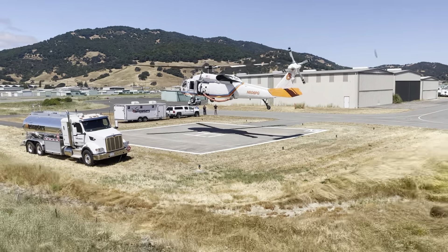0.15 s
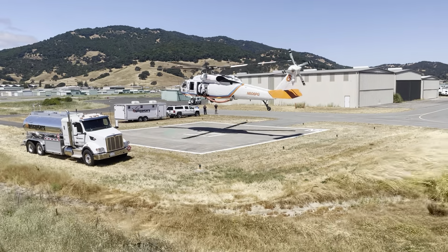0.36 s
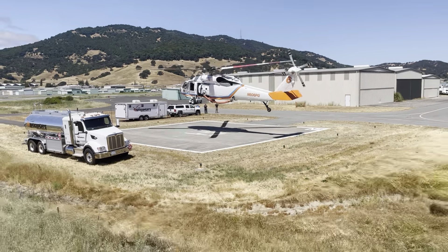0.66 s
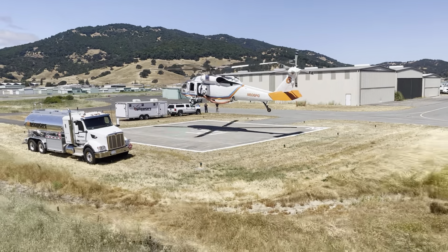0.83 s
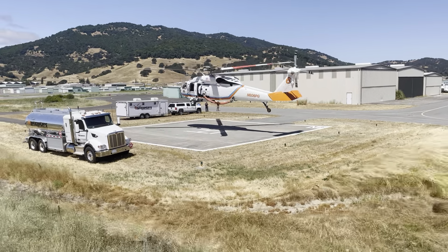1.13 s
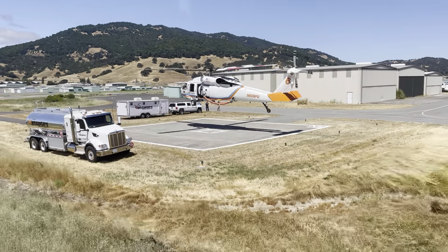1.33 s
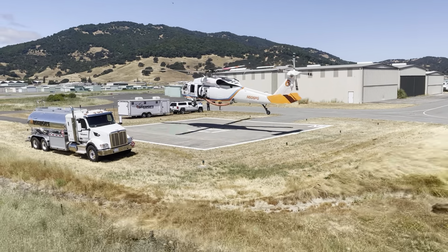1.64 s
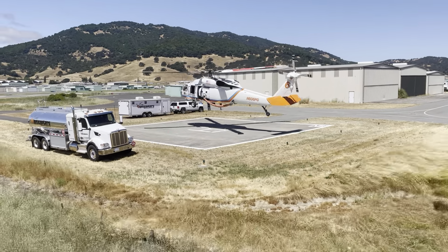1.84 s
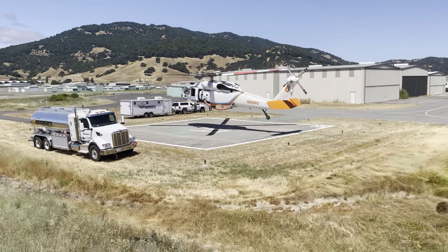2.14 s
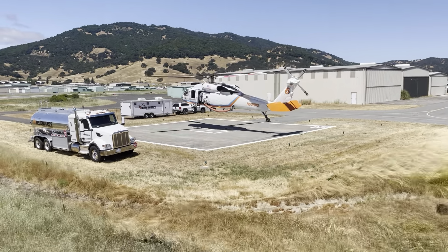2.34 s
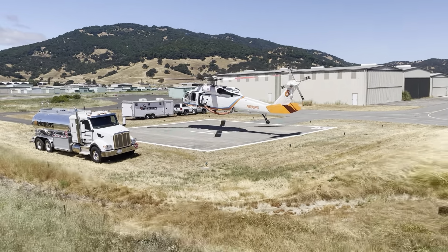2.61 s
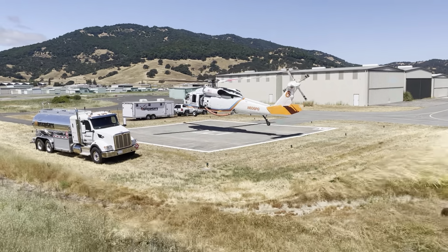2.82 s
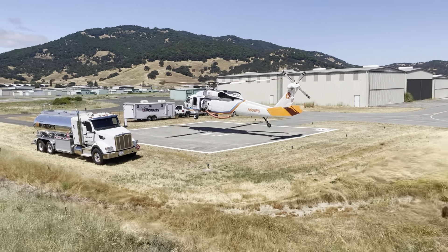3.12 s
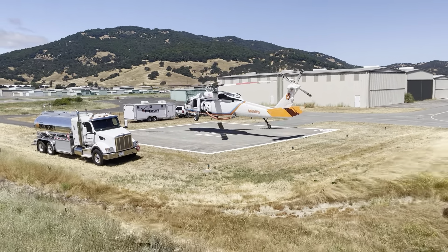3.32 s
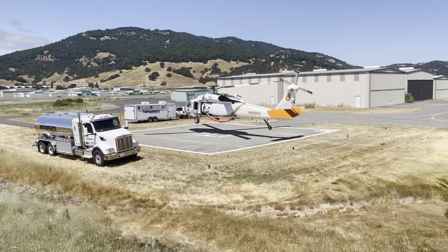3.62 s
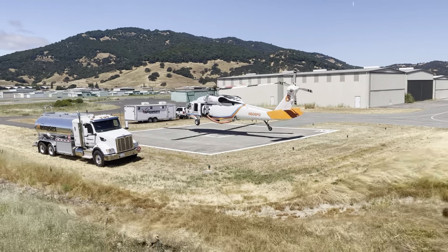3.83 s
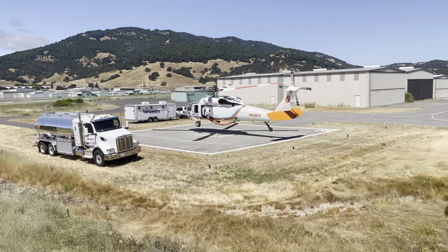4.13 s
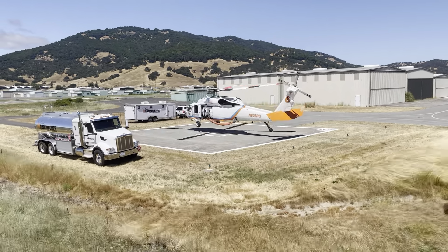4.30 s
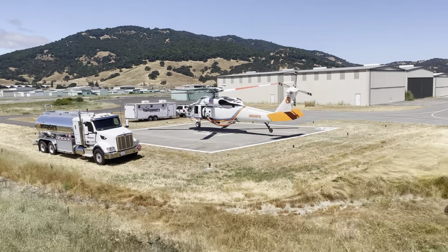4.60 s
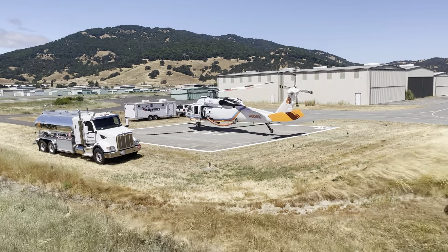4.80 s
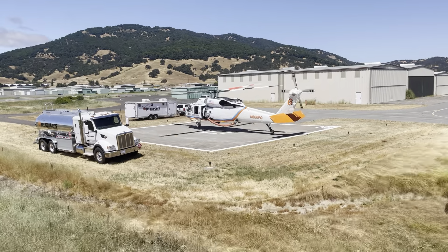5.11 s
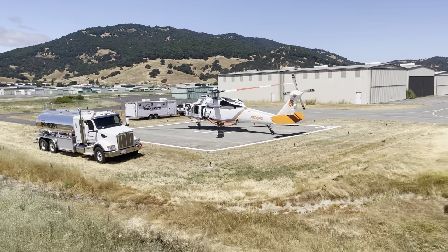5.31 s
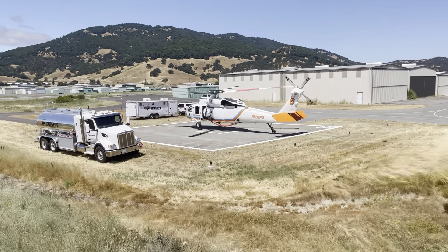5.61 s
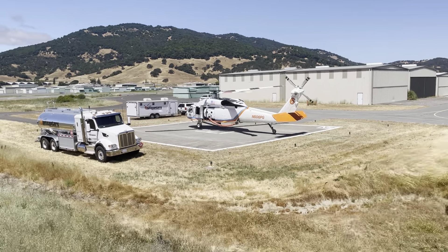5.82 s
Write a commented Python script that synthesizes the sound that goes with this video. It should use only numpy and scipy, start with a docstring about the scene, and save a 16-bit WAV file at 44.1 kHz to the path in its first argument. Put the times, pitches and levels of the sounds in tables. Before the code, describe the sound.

A twin-turbine helicopter descends to a pad across an open field, loud throughout for about six seconds. Noisy air pulses some seventeen times a second, coloured hollow by its ground reflection, under bright blade-tip hiss, broad exhaust roar, a faint very high whine and quick tail-rotor ticks. From 0 to 2.5 s rotor wash batters the stereo microphone: deep uneven buffeting, fluttering gusts and blunt, falling thuds, heaviest around 1.0 and 1.5 s. A thin gear tone flares now and then until 3 s, most clearly near 2.8. From 2 s the blades begin to crack in gritty bursts, with dry bright snaps between 3.3 and 5.2 s; the whine edges upward from 2.2 to 3.5. Brief gusts return near 4 s. The exhaust roar dips around 4.9 while low, hollow slaps thicken. At 5.2 s gusts and thuds crowd in again, then ease while the rotor keeps beating to the end.

```python
"""A twin-turbine helicopter sinks to a pad across a field: filtered noise beats once per main blade, direct and off
the ground, under tip hiss, turbine roar, thin whine, gear tone and tail ticks. In the first 2.5 s rotor wash buffets
two microphone ports with noise gusts and falling, squared-off thuds; the gear tone flares until 3 s. From 2 s blades
crack in sudden noise bursts and snaps; the whine climbs from 2.2 to 3.5 s. The roar dips near 4.9 s, and gusts and
thuds crowd in again at 5.2 s."""
import sys
import numpy as np
from scipy import signal
from scipy.fft import rfft, irfft, next_fast_len
from scipy.io import wavfile
from scipy.ndimage import uniform_filter1d, minimum_filter1d, map_coordinates

SR = 44100
rng = np.random.default_rng(int(sys.argv[2]) if len(sys.argv) > 2 else 0)


def wav_record(signal):
    """Record a signal, one row per channel, as 16-bit PCM in the file named by sys.argv[1]."""
    frames = np.transpose(np.atleast_2d(signal))
    bounded = np.clip(frames, -1, 1)
    # unit amplitude maps onto the largest positive 16-bit level
    quanta = np.round(bounded * 32767).astype(np.int16)
    wavfile.write(sys.argv[1], SR, quanta)


N = 262387

BLADE_HZ, TAIL_HZ = 17.25, 79.6  # blade passes per second, main and tail rotor
SOUND_M_PER_S = 343


def amp(db):
    """Decibels to gain."""
    return 10 ** (np.asarray(db) / 20)


def unit(x):
    """Scaled to rms 1."""
    return x / np.sqrt(np.mean(x ** 2) + 1e-20)


def along(points, hz):
    """Rows of (hz, value, ..) interpolated on a log frequency axis, one curve per value column."""
    point_hz, *columns = np.transpose(points)
    return [np.interp(np.log(hz + 1), np.log(point_hz + 1), column) for column in columns]


def curves(rows):
    """One value per sample for each column after the time."""
    time_s, *columns = np.transpose(rows)
    return [np.interp(np.arange(N) / SR, time_s, column) for column in columns]


def wobble(rate_hz):
    """A smooth random curve with rate_hz knots a second."""
    knots = rng.standard_normal(int(N * rate_hz / SR) + 4)
    return map_coordinates(knots, [np.arange(N) * rate_hz / SR])


def swells(at_s, sigma_s, peak_db, base_db):
    """Bell-shaped swells of gain over a base level, added in power."""
    t = np.arange(N) / SR
    bells = amp(np.c_[peak_db]) * np.exp(-.5 * ((t - np.c_[at_s]) / np.c_[sigma_s]) ** 2)
    return np.sqrt(amp(base_db) ** 2 + np.sum(bells ** 2, axis=0))


def filtered(x, response):
    """x times a complex response of frequency."""
    m = next_fast_len(N + SR // 2)
    spectrum = rfft(x, m) * response(np.fft.rfftfreq(m, 1 / SR))
    return irfft(spectrum, m)[..., :N]


def rush(spectrum, patchy_db, ports, echo=0):
    """Patchy noise of rms 1 at both ports; echo = share that comes again off the ground."""
    z = signal.stft(rng.standard_normal((2, N)), nperseg=256)[2]
    field = uniform_filter1d(rng.standard_normal(z.shape[1:]), size=4, axis=0)
    field = uniform_filter1d(field, size=10, axis=1)
    pair = signal.istft(z * amp(patchy_db * unit(field)), nperseg=256)[1][:, :N]

    def colour(hz):
        # the longer path over the ground makes a comb; rough grass blurs it in the treble
        ground = 1 + echo * np.exp(-hz / 2500 - 2j * np.pi * hz * 0.002953)
        turn = np.arccos(np.clip(along(ports, hz)[0], 0, 1)) / 2
        return amp(along(spectrum, hz)[0]) * ground * [np.cos(turn), np.sin(turn)]

    def lead(hz):
        _, angle_rad, louder_db = along(ports, hz)
        half = amp(louder_db / 2) * np.exp(.5j * angle_rad)
        return np.array([half, 1 / half])

    shared, own = filtered(pair, colour)
    return unit(filtered(np.array([shared + own, shared - own]), lead))


def firm(x, size):
    """Noise with its chance dips evened out over size samples, so that every burst lands with its full weight."""
    power = uniform_filter1d(np.mean(x ** 2, axis=0), size=size)
    return unit(x / np.sqrt(np.abs(power) + .05))


# aircraft drift, which shifts the beat: time_s, beyond_nearest_m
DRIFT_PATH = [(0, 4.2), (.6, 2.8), (1.4, .7), (2.6, 0), (3.4, .7), (4.2, 1), (5, 1.7), (5.95, 1.7)]


def beat(late, steep, blades_db, uneven_db):
    """A swell (-1 to 1) per blade, late by a share of the beat, squarer with steep; and a strength curve in dB."""
    delay_s = curves(DRIFT_PATH)[0] / SOUND_M_PER_S
    turns = (np.arange(N) / SR - delay_s) * BLADE_HZ - late
    blade = np.round(turns).astype(int)
    chance_db = rng.normal(0, uneven_db, blade[-1] + 2)[blade]
    strength_db = np.take(blades_db, blade, mode="wrap") + chance_db
    swell = np.cos(2 * np.pi * turns)
    return np.tanh(steep * swell) / np.tanh(steep), strength_db * (1 + swell) / 2


# main rotor before beat and waver: time_s, level_db, beat_depth_db, ground_peak_1_db, ground_peaks_2_3_db
ROTOR_LEVELS = [(0, -24.5, 3, -49, -44), (.5, -23, 4, -58, -47), (.8, -20.5, 2.5, -38, -33),
                (1.2, -21, 3.5, -51, -28.5), (1.5, -23.5, 4, -34, -36), (1.8, -23, 2, -51, -23),
                (2.3, -22.5, 4, -31, -32.5), (2.75, -21.5, 2, -30.5, -46), (2.98, -25, 4, -32, -21.5),
                (3.2, -26.5, 2, -24, -25.5), (3.45, -27, 5.5, -37.5, -34), (3.75, -32, 1, -30.5, -29.5),
                (4.05, -22.5, 6, -30, -58), (4.2, -28.5, 4.5, -26.5, -27.5), (4.35, -28.5, 5.5, -32, -26),
                (4.6, -26, 2.5, -27.5, -26.5), (4.78, -19.5, 4, -21.5, -23), (4.95, -26.5, 3.5, -20, -25.5),
                (5.1, -24, 6.5, -24, -29), (5.36, -21.5, 4, -54, -29), (5.6, -29, 7, -32, -31.5),
                (5.95, -27.5, 4, -22.5, -32.5)]
# churned air, before the ground echo: freq_hz, relative_db
SWISH_SPECTRUM = [(30, -90), (60, -67), (200, -11), (400, -8.5), (800, -7.5), (1100, -2.5), (1350, -5.5),
                  (1650, -9), (2200, -9), (2800, -15), (3500, -18.5), (6000, -24), (9000, -95),
                  (12000, -110)]
# first ground-comb peak: freq_hz, relative_db
DRUM_SPECTRUM = [(60, -110), (170, -20), (260, -8), (345, 3), (430, -2), (520, -11), (620, -24),
                 (2000, -110)]
# second and third ground-comb peaks: freq_hz, relative_db
HOLLOW_SPECTRUM = [(200, -110), (500, -26), (630, -5), (715, 0), (800, -6), (900, -11), (1060, -3),
                   (1250, -12), (1600, -36), (4000, -110)]
# port pair for sound from the aircraft: freq_hz, likeness_0_to_1, left_leads_rad, left_louder_db
AIRCRAFT_PORTS = [(100, .8, .3, 0), (500, .5, .1, 1.5), (1000, .6, -.2, 1.7), (2400, .8, -.5, .5),
                  (3300, .62, -1, -2), (4400, .55, -.5, -1.5), (5200, .3, -.9, -1.5), (6000, .1, 1.2, -1.5),
                  (6900, .55, 2.7, -1), (7600, .99, 3.1, 0), (8350, .99, 3.2, 0), (8900, .87, 3.8, 0),
                  (10300, .8, 5.1, 0), (10500, .98, 6.1, 0), (12250, .99, 6.3, 0), (12600, .55, 7.3, 0),
                  (13400, .8, 8.4, 0), (13800, .99, 9.4, 0), (16000, .99, 9.4, 0)]
# churn strength of the four blades, alike: strength_db
CHURN_STRENGTHS_DB = [-4.5, -4.5, -4.5, -4.5]


def rotor():
    """Blade bursts of churned air; the lowest peaks of the ground comb swell as the height changes."""
    level_db, depth_db, drum_db, hollow_db = curves(ROTOR_LEVELS)
    swell, strength_db = beat(late=.28, steep=2.4, blades_db=CHURN_STRENGTHS_DB, uneven_db=.5)
    tail_db = 0.6 * np.cos(2 * np.pi * TAIL_HZ * np.arange(N) / SR)
    churn_db = .8 * wobble(50) + 1.1 * wobble(110) + .9 * wobble(250)
    body = amp(level_db) * rush(SWISH_SPECTRUM, patchy_db=1.5, ports=AIRCRAFT_PORTS, echo=0.28)
    alike = [(350, .85, 0, .5), (800, .65, -.2, 1.6)]  # these low peaks reach both ports much alike
    drum = amp(drum_db) * rush(DRUM_SPECTRUM, patchy_db=-0.9, ports=alike)
    hollow = amp(hollow_db) * rush(HOLLOW_SPECTRUM, patchy_db=2.5, ports=alike)
    beat_db = depth_db * (swell - 0.16) + strength_db
    return amp(beat_db + tail_db + churn_db) * (body + drum + hollow)


# blades that cut a vortex and crack, before edge and grit: start_s, crack_db, ground_peak_1_db, hold_s
SLAP_EVENTS = [(2.018, -26, -36, 0.0072), (2.074, -22, -34, .008), (2.221, -39, -24.5, .015),
               (2.29, -26, -25, .02), (2.335, -26, -24, 0.024), (2.392, -28, -25, 0.016),
               (2.438, -27, -34, .022), (2.549, -25.5, -37, .018), (2.602, -27, -35, 0.013),
               (2.666, -24, -32, 0.025), (2.718, -22, -24, 0.023), (2.782, -21.5, -22, 0.021),
               (2.836, -22, -30, 0.023), (2.902, -28, -28, 0.012), (2.955, -18.5, -42, 0.018),
               (3.014, -23.5, -26, .022), (3.064, -27, -28, .025), (3.125, -24.5, -30, 0.012),
               (3.188, -24, -25, 0.01), (3.247, -29, -23.5, 0.021), (3.363, -28.5, -37, 0.032),
               (3.421, -27, -24, .024), (3.489, -26, -33, 0.016), (3.541, -20, -26.5, 0.024),
               (3.604, -24.5, -30, 0.019), (3.655, -23.5, -35, .028), (3.719, -26, -36, 0.013),
               (3.771, -23, -20.5, .014), (3.828, -25, -24, 0.014), (3.893, -26, -24, 0.011),
               (4.06, -26.5, -24, 0.018), (4.129, -21.5, -29, 0.0075), (4.178, -27, -36, 0.027),
               (4.243, -24, -31, 0.025), (4.292, -25, -29, 0.035), (4.359, -26.5, -32, 0.034),
               (4.411, -21, -32, 0.022), (4.475, -25, -27, .016), (4.53, -25.5, -34, 0.021),
               (4.583, -29, -32, 0.032), (4.645, -32, -27, 0.02), (4.697, -24.5, -21, 0.02),
               (4.754, -23.5, -25, 0.018), (4.827, -29, -20, .025), (4.878, -22, -16.5, 0.027),
               (4.922, -21.5, -24, .005), (4.932, -24.5, -17, 0.031), (4.991, -22.5, -16.5, 0.031),
               (5.052, -22, -19, 0.031), (5.111, -31, -21, 0.022), (5.154, -30, -28, 0.017),
               (5.287, -21, -25, 0.018), (5.59, -33, -24, .015), (5.706, -32, -46, 0.01),
               (5.753, -35, -26, 0.0084), (5.855, -43, -36, 0.016), (5.923, -25, -24, 0.017)]
# crack colour: freq_hz, relative_db
CRACK_SPECTRUM = [(150, -60), (450, -12), (720, 5), (880, -6), (1080, 3), (1350, -4), (1650, -12),
                  (2100, -8), (2700, -12), (4500, -22), (8000, -48), (12000, -100)]
# short bright snaps, before SNAP_RAISE_DB: start_s, level_db
SNAP_EVENTS = [(2.05, -15), (2.284, -16), (2.61, -16), (3.266, -18), (3.3215, -17), (3.3694, -14),
               (3.4176, -17), (3.556, -9), (3.615, -15), (3.871, -22), (3.8945, -22), (4.0733, -16),
               (4.131, -14), (4.195, -6), (4.249, -12), (4.2981, -25), (4.356, -14), (4.379, -8),
               (4.4205, -16), (4.433, -20), (4.4792, -20), (4.537, -23), (4.608, -17), (4.6638, -14),
               (4.723, -15), (4.776, -11), (4.8974, -25), (4.948, -13), (5.005, -27), (5.0688, -19),
               (5.1216, -13), (5.1776, -16), (5.2899, -24), (5.3443, -23), (5.457, -26)]
# snap colour: freq_hz, relative_db
SNAP_SPECTRUM = [(400, -50), (900, -10), (1600, 11), (2600, -4), (4000, -4), (6000, -22), (8000, -45),
                 (12000, -100)]
SLAP_ATTACK_S, SLAP_T60_S = .0007, .015
SLAP_EDGE, SLAP_EDGE_S = .8, .004  # the leading edge overshoots by up to this share and settles
GRIT_DB = 2.2  # a crack breaks up into spikes
SNAP_ATTACK_S, SNAP_T60_S, SNAP_RAISE_DB = 0.00043, 0.007, 2.5


def slaps():
    """Bursts of air noise that start suddenly, hold and stop; and much shorter, brighter snaps."""
    crack, drum, snap = np.zeros((3, N + SR))
    t = np.arange(SR // 10) / SR
    for start_s, crack_db, drum_db, hold_s in SLAP_EVENTS:
        burst = slice(round(start_s * SR), round(start_s * SR) + len(t))
        decay = amp(-60 * np.maximum(t - hold_s, 0) / SLAP_T60_S)
        shape = decay * (1 - np.exp(-t / SLAP_ATTACK_S))
        crack[burst] += amp(crack_db) * shape * (1 + SLAP_EDGE * np.exp(-t / SLAP_EDGE_S))
        drum[burst] += amp(drum_db) * shape
    for start_s, level_db in SNAP_EVENTS:
        decay = amp(level_db + SNAP_RAISE_DB - 60 * t / SNAP_T60_S)
        snap[round(start_s * SR):][:len(t)] += decay * (1 - np.exp(-t / SNAP_ATTACK_S))
    crack_air = firm(rush(CRACK_SPECTRUM, patchy_db=-1.5, ports=AIRCRAFT_PORTS), size=200)
    drum_air = firm(rush(DRUM_SPECTRUM, patchy_db=-2.2, ports=[(350, 0.91, 0, 1)]), size=400)
    snap_air = firm(rush(SNAP_SPECTRUM, patchy_db=-5.5, ports=AIRCRAFT_PORTS), size=100)
    grit = amp(GRIT_DB * wobble(220))
    return crack[:N] * grit * crack_air + drum[:N] * drum_air + snap[:N] * snap_air


# blade-tip hiss before the beat: time_s, level_db
TIP_LEVELS = [(0, -38), (.4, -31), (.75, -34), (1.5, -36.5), (1.9, -38), (2.5, -34), (3, -31),
              (3.25, -35.5), (3.7, -35), (3.95, -35.5), (4.4, -35), (4.9, -33.5), (5.5, -34.5),
              (5.95, -33.5)]
# tip hiss colour: freq_hz, relative_db
HISS_SPECTRUM = [(3000, -17), (5500, -8.5), (7000, 5.5), (8200, -1), (9500, 2.5), (10800, -8), (12500, -13),
                 (15000, -40)]
# tip strength of the four blades, not trimmed alike: strength_db
TIP_STRENGTHS_DB = [-1, 0.5, -1.5, 2]
# the hiss beats deeper with the rotor's beat (dB per dB) and the descent
TIP_BEAT_DB, TIP_BEAT_FOLLOWS, TIP_BEAT_DB_PER_S = 1.6, 0.39, 0.2


def tips():
    """The fast blade tips hiss as each one sweeps towards the microphone."""
    rotor_depth_db = curves(ROTOR_LEVELS)[1]
    depth_db = TIP_BEAT_DB + TIP_BEAT_FOLLOWS * rotor_depth_db + TIP_BEAT_DB_PER_S * np.arange(N) / SR
    swell, strength_db = beat(late=.32, steep=.6, blades_db=TIP_STRENGTHS_DB, uneven_db=.7)
    level_db = curves(TIP_LEVELS)[0] + depth_db * (swell - 1.02) + strength_db
    return amp(level_db) * rush(HISS_SPECTRUM, patchy_db=2.6, ports=AIRCRAFT_PORTS)


# spells in which the tail ticks stand out: peak_at_s, sigma_s, peak_db
TAIL_SPELLS = [(1.4, 0.25, -36), (2.7, 0.38, -49), (3.37, 0.06, -31), (3.894, 0.041, -31.5),
               (4.3, 0.55, -48), (5.95, 0.17, -36.5)]
# tick colour: freq_hz, relative_db
TICK_SPECTRUM = [(1500, -10), (2600, 1), (3300, 2), (4500, -2), (6000, -2), (8000, -48), (12000, -90)]
TAIL_BASE_DB = -43.5  # between the spells
TICK_SIGMA_S = 0.0018


def tail_rotor():
    """Each tail blade ticks once a turn; every second blade cuts harder."""
    turns = np.arange(N) * TAIL_HZ / SR - .22
    blade = np.round(turns).astype(int)
    size_db = rng.normal(0, 1.8, blade[-1] + 2)[blade] - 7 * (blade % 2)
    from_tick_s = (turns - blade) / TAIL_HZ
    tick = amp(size_db) * np.exp(-.5 * (from_tick_s / TICK_SIGMA_S) ** 2)
    air = rush(TICK_SPECTRUM, patchy_db=1.2, ports=[(3500, .45, -1.2, -2.5)])
    return swells(*np.transpose(TAIL_SPELLS), TAIL_BASE_DB) * unit(tick * air)


def tone(hz, blur_hz, rate_hz, steady=0):
    """A sine of rms 1 whose pitch and size waver, the size around a steady part."""
    phase = 2 * np.pi * np.cumsum(hz + blur_hz * wobble(rate_hz)) / SR
    _, angle_rad, _ = along(AIRCRAFT_PORTS, np.mean(hz))
    pair = np.sin([phase + angle_rad / 2, phase - angle_rad / 2])
    return unit((steady + wobble(rate_hz)) * pair)


# exhaust roar before shading and waver: time_s, level_db
ROAR_LEVELS = [(0, -29.5), (.35, -23), (.7, -31.5), (1.1, -27), (2.1, -26.5), (2.45, -29), (2.6, -27),
               (2.8, -26.5), (2.92, -25.5), (3.2, -27.5), (3.8, -28), (4.2, -28.5), (4.6, -36), (4.9, -44),
               (5.25, -32), (5.95, -29.5)]
# exhaust roar colour: freq_hz, relative_db
ROAR_SPECTRUM = [(200, 13), (600, 8), (1500, 7), (3000, 2), (4500, -2), (6500, -3.5), (9000, -22),
                 (12000, -45)]
# intake air colour: freq_hz, relative_db
AIR_SPECTRUM = [(5000, -30), (9000, -4), (11000, 0), (12300, -5), (14000, -4.5), (16000, -5.5)]
# flares of the gear tone: peak_at_s, peak_db
GEAR_FLARES = [(.3, -41), (.7, -41), (1.05, -42), (1.35, -41), (2.35, -44), (2.6, -40), (2.76, -36),
               (3.02, -42)]
SHADE_DB, SHADE_DB_PER_S = -0.15, 0.28  # the blades shade the turbines more as the aircraft sinks
AIR_START_DB, AIR_FADE_DB_PER_S, AIR_WAVER_DB = -43, 0.6, 0.9
WHINE_START_DB, WHINE_FADE_DB_PER_S = -48.5, 1.1
WHINE_START_HZ, WHINE_RISE_HZ, WHINE_RISE_S = 13300, 132, (2.2, 3.5)  # the compressor speeds up
GEAR_HZ, GEAR_BASE_DB, GEAR_FLARE_SIGMA_S = 2599, -48, 0.07


def turbines():
    """Exhaust roar and intake air, shaded a little by the passing blades; the compressor whine and the gear tone."""
    t = np.arange(N) / SR
    swell, _ = beat(late=0.54, steep=0.73, blades_db=[0], uneven_db=0)
    shade_db = (SHADE_DB + SHADE_DB_PER_S * t) * swell
    roar_db = curves(ROAR_LEVELS)[0] + shade_db + 1.67 * wobble(22.05) + 0.91 * wobble(90)
    roar = amp(roar_db) * rush(ROAR_SPECTRUM, patchy_db=2.5, ports=AIRCRAFT_PORTS, echo=0.067)
    air_db = AIR_START_DB - AIR_FADE_DB_PER_S * t + AIR_WAVER_DB * wobble(2.8)
    air_db = air_db + .6 * shade_db + 0.44 * wobble(30)
    air = amp(air_db) * rush(AIR_SPECTRUM, patchy_db=1.2, ports=AIRCRAFT_PORTS)
    whine_hz = np.interp(t, WHINE_RISE_S, (WHINE_START_HZ, WHINE_START_HZ + WHINE_RISE_HZ))
    whine_db = WHINE_START_DB - WHINE_FADE_DB_PER_S * t
    whine = amp(whine_db) * tone(whine_hz, blur_hz=110, rate_hz=330)
    flare_s, flare_db = np.transpose(GEAR_FLARES)
    gear_gain = swells(flare_s, [GEAR_FLARE_SIGMA_S], flare_db, GEAR_BASE_DB)
    gear = gear_gain * tone(GEAR_HZ, blur_hz=9, rate_hz=35, steady=1.5)
    return roar + air + whine + gear


# rotor wash on the ports between gusts, slowly rising and falling, before waver: time_s, buffet_db, flutter_db
WASH_LEVELS = [(0, -21, -25), (.55, -25, -27), (.92, -25, -31), (1.15, -20.5, -26), (1.5, -19, -22),
               (2.1, -20.5, -30), (2.6, -31, -28.5), (3.1, -28.5, -37.5), (3.7, -22.5, -36),
               (4.3, -28, -33.5), (4.75, -31.5, -38), (5.1, -27, -31), (5.5, -26.5, -29.5),
               (5.95, -30.5, -44)]
# gusts of the wash, before waver: peak_at_s, sigma_s, buffet_db, flutter_db
GUST_EVENTS = [(0.137, 0.02, -17, -24), (0.303, 0.044, -18.5, -30), (0.713, 0.045, -19, -21),
               (0.82, 0.027, -18.5, -21), (0.988, 0.016, -21, -17.5), (1.045, 0.039, -16, -15.5),
               (1.285, 0.074, -18.5, -21.5), (1.575, 0.059, -18, -18), (1.675, 0.038, -15.5, -40),
               (1.903, 0.012, -14, -18.5), (1.993, 0.024, -24, -17), (2.067, 0.035, -27, -20.5),
               (2.174, 0.032, -20, -27.5), (2.334, 0.039, -32, -24), (2.426, 0.038, -16.5, -24),
               (2.538, 0.033, -14.5, -31), (2.697, 0.082, -20, -36), (3, 0.036, -24, -31),
               (3.4, 0.016, -26, -28.5), (3.58, 0.096, -39, -26.5), (4.038, 0.045, -17.5, -21),
               (5.22, 0.037, -23, -17.5), (5.278, 0.051, -19, -15.5), (5.35, 0.036, -22, -27),
               (5.468, 0.02, -25, -43), (5.693, 0.036, -28, -30)]
# deep buffet colour: freq_hz, relative_db
BUFFET_SPECTRUM = [(15, -42), (28, -26), (45, 0), (65, 3.5), (110, 0), (170, -5), (260, -11.5), (500, -66),
                   (2000, -110)]
# brighter flutter colour: freq_hz, relative_db
FLUTTER_SPECTRUM = [(40, -80), (90, -25), (180, -2), (260, -3), (450, -3), (800, -9), (1400, -20),
                    (2500, -60), (6000, -110)]


def wash():
    """Eddies press on the ports: a deep buffet, and a brighter flutter that differs more from port to port."""
    buffet_db, flutter_db = curves(WASH_LEVELS)
    at_s, sigma_s, gust_buffet_db, gust_flutter_db = np.transpose(GUST_EVENTS)
    lumps_db = 0.77 * wobble(45) + 0.57 * np.array([wobble(12), wobble(16.0)])
    buffet = rush(BUFFET_SPECTRUM, patchy_db=.8, ports=[(60, .6, .1, -.5), (200, .55, .5, 0)])
    flutter = rush(FLUTTER_SPECTRUM, patchy_db=2.2, ports=[(197, 0.48, 0.87, -1), (700, 0.3, -1.2, 1)])
    flutter = amp(1.2 * wobble(30)) * flutter
    buffet_gain = swells(at_s, sigma_s, gust_buffet_db, buffet_db)
    flutter_gain = swells(at_s, sigma_s, gust_flutter_db, flutter_db)
    return amp(lumps_db) * (buffet_gain * buffet + flutter_gain * flutter)


# single hard eddies, level before shaping, pitch before the fall: start_s, level_db, pitch_hz, length_s
THUD_EVENTS = [(0.017, -9, 105.5, 0.033), (0.06, -14.5, 90, 0.023), (.152, -17, 99, 0.02),
               (0.189, -9, 124, 0.03), (.262, -11, 170, 0.021), (.283, -17, 110, 0.017),
               (.3, -11, 113, 0.028), (.595, -20, 100, 0.025), (0.678, -16, 200, 0.015),
               (.725, -13.5, 150, 0.035), (.787, -15, 110, .025), (.996, -11, 169, 0.014),
               (1.037, -6, 127, 0.02), (1.061, -9.5, 221, 0.019), (1.081, -15, 250, 0.014),
               (1.119, -17.5, 119, 0.037), (1.194, -10, 200, .01), (1.271, -12, 85, 0.04),
               (1.333, -9.5, 199, 0.024), (1.433, -14.5, 194, 0.021), (1.549, -4.5, 320, .02),
               (1.568, -9, 95, .028), (1.605, -14, 260, .014), (1.634, -15, 240, .014),
               (1.665, -11.5, 126, 0.033), (1.69, -18, 90, .03), (1.762, -12, 128, 0.022),
               (1.892, -13.5, 123, 0.031), (1.99, -13.5, 150, 0.03), (2.049, -19, 95, 0.065),
               (2.165, -19, 90.5, 0.029), (2.394, -14, 112.4, 0.035), (2.334, -10, 150, 0.022),
               (2.438, -18, 139, 0.021), (2.517, -15, 108, 0.034), (3.635, -15, 141, .024),
               (4.017, -14, 152, 0.033), (4.051, -13.5, 170, .024), (5.171, -13, 220, 0.024),
               (5.187, -9.5, 278, 0.02), (5.246, -12.5, 291, 0.036), (5.292, -11, 303, 0.018),
               (5.305, -14, 60, 0.05), (5.455, -12, 139, 0.017)]


def thuds():
    """Uneven pressure swings, equal on both ports, falling in pitch as the eddy slows, squared off at their tops."""
    out = np.zeros(N + SR)
    for start_s, level_db, pitch_hz, length_s in THUD_EVENTS:
        u = np.linspace(0, 1, round(length_s * SR))
        uneven = 3.5 * uniform_filter1d(rng.standard_normal(len(u)), size=90)
        sweep_hz = pitch_hz * (1.3 - .7 * u + uneven)
        swing = np.tanh(1.2 * np.sin(2 * np.pi * np.cumsum(sweep_hz) / SR))
        out[round(start_s * SR):][:len(u)] += amp(level_db) * np.sin(np.pi * u ** .6) * swing
    return out[:N]


def scene():
    """All sources at the two ports."""
    return rotor() + slaps() + tips() + tail_rotor() + turbines() + wash() + thuds()


BASS_CUT_HZ, TOP_HZ = 30, 15720
LIMIT = .93  # of full scale


def record(dry):
    """A bass cut; a limiter eases the gain down ahead of the largest peaks; nothing is kept above the band limit."""
    cut = filtered(dry, lambda hz: (1j * hz / (BASS_CUT_HZ + 1j * hz)) ** 2)
    needed = np.minimum(1, LIMIT / (np.abs(cut).max(axis=0) + 1e-9))
    gain = uniform_filter1d(minimum_filter1d(needed, size=800), size=400)
    return filtered(cut * gain, lambda hz: hz < TOP_HZ)


dry = scene()
out = record(dry)
wav_record(out)
```